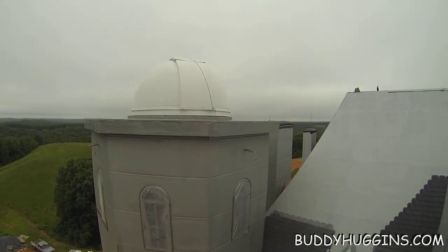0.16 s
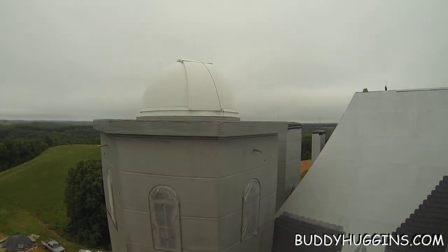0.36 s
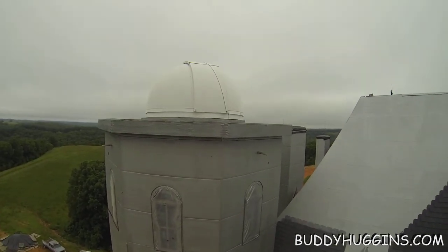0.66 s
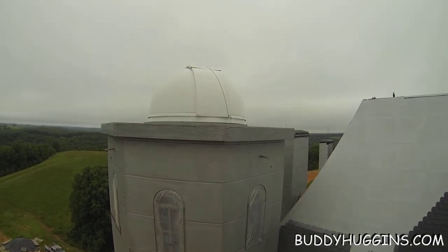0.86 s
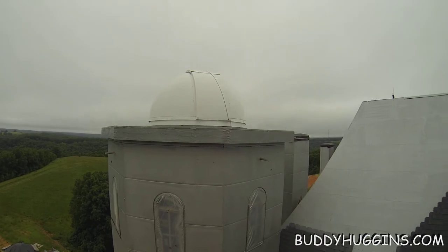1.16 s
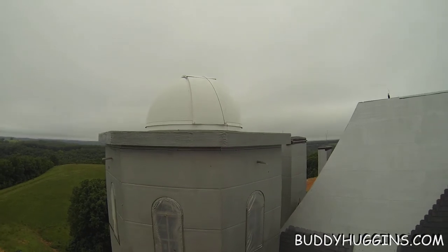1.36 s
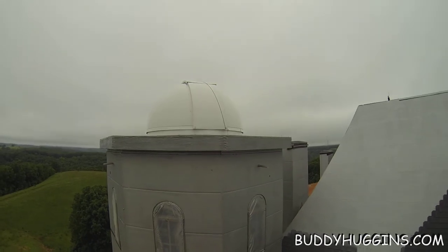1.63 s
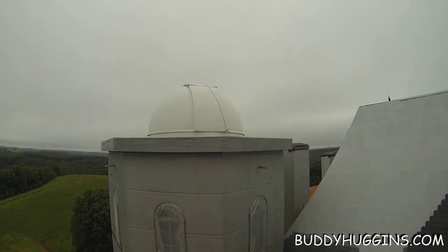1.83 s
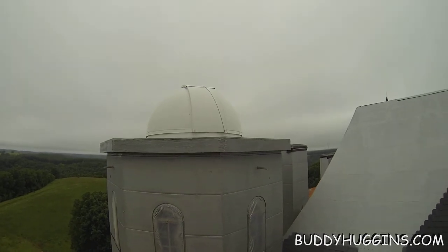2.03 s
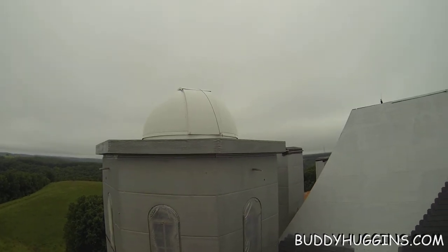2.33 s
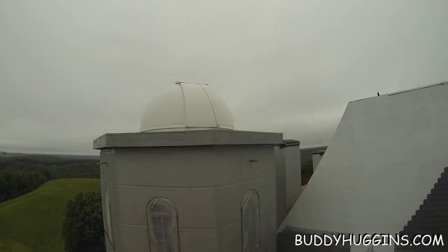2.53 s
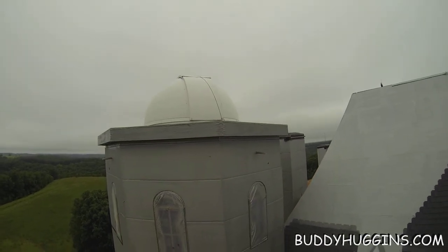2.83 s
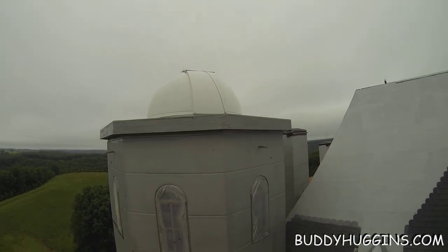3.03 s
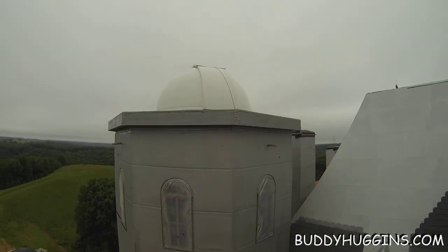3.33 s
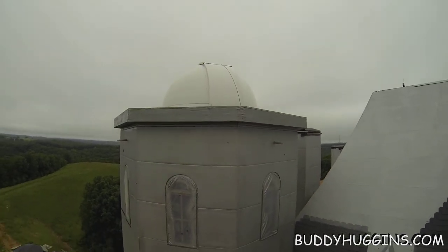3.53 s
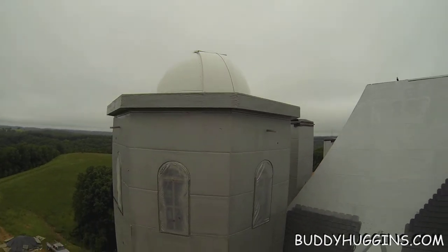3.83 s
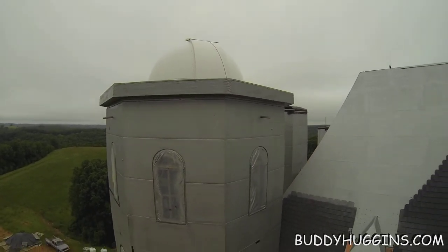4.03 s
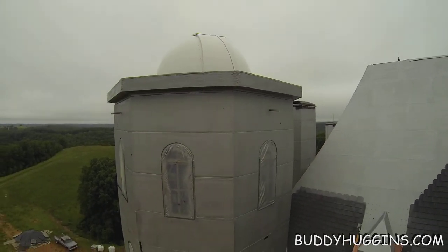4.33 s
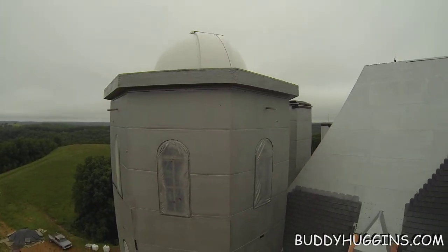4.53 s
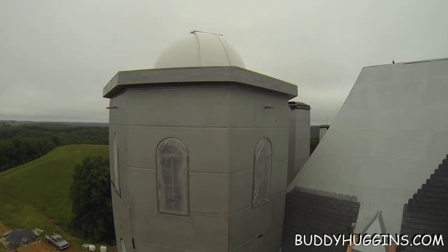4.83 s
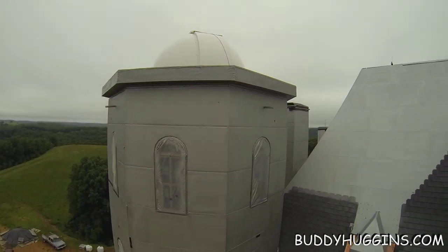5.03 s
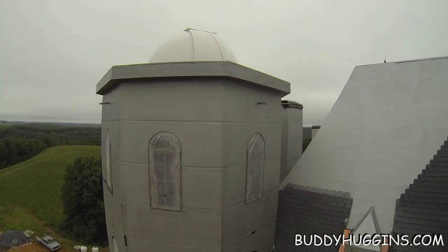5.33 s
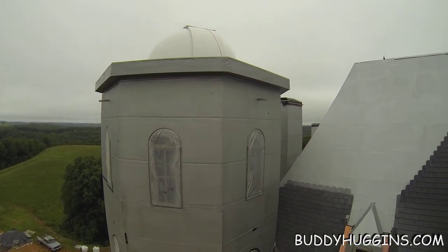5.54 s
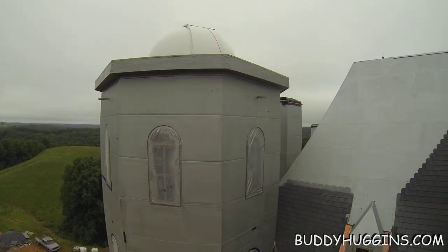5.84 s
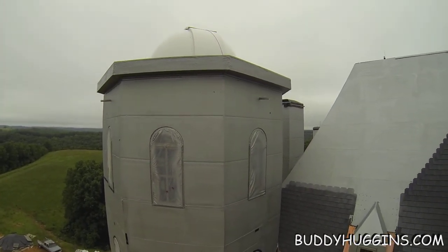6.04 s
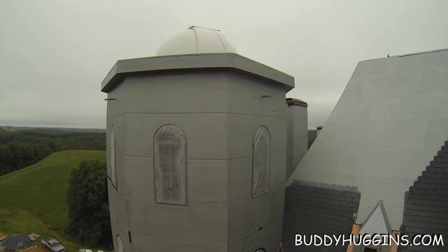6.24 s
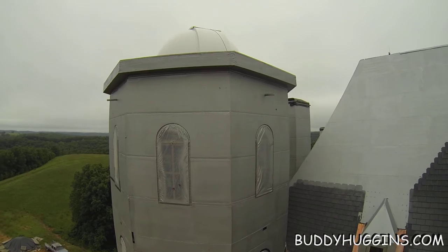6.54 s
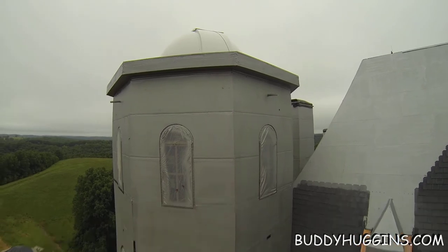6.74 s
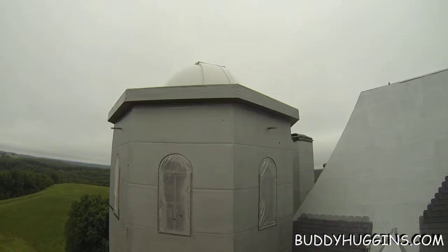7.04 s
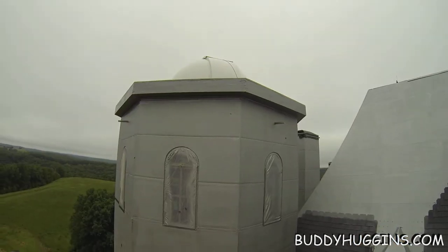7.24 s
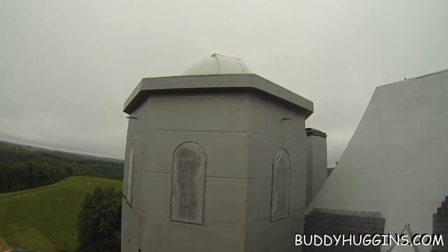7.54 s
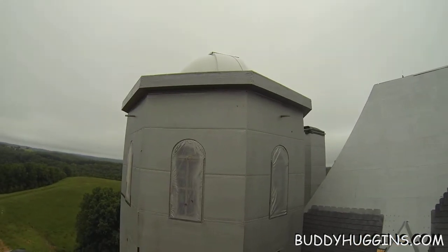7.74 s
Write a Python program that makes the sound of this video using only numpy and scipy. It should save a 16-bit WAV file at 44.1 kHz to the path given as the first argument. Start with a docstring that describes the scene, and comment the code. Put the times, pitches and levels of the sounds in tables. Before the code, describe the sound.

A diesel engine hums low and steadily below a lift basket outdoors; loose metal clatters, then a latch snaps hard nearby and the sound ducks.

```python
"""A diesel hums steadily throughout, far below a small microphone in the basket of a boom lift. The hum is a
stack of sines locked to the four-stroke cycle; roar, rumble and hiss are shaped noise. Loose metal clatters in
the distance in ragged noise bursts, the rail is tapped and a distant bird chirps twice. A latch snaps twice
close to the microphone as decaying sines with a short rattle. A limiter then ducks everything and lets it creep
back."""
import sys
import numpy as np
from scipy import signal
from scipy.io import wavfile
from scipy.ndimage import uniform_filter1d, minimum_filter1d, map_coordinates

SR = 44100
rng = np.random.default_rng(int(sys.argv[2]) if len(sys.argv) > 2 else 0)


def master_out(mix):
    """Clip the mix to full scale and print it as 16-bit PCM to the path in sys.argv[1]."""
    frames = np.transpose(np.atleast_2d(mix))
    ceiling = np.clip(frames, -1, 1)
    pcm = np.round(ceiling * 32767).astype(np.int16)
    wavfile.write(sys.argv[1], SR, pcm)


N = 347949
T = np.arange(N) / SR  # seconds
CONTROL_STEP = 64  # samples between points of the slow engine curves
CONTROL_T = T[::CONTROL_STEP]

# All levels are ahead of the limiter. Noise colours are relative: each noise is evened to rms 1,
# and each clatter knock is scaled by the spread of its own colour.
# Distant bird: start_s, length_s, top_pitch_hz, fundamental_level_db
BIRD_CHIRPS = [(3.255, .052, 2680, -44), (4.578, .04, 2690, -46)]
CHIRP_ARCH, CHIRP_OCTAVE_DB = 0.02, -9  # share by which the pitch arches; level of the octave

# Levels of the wash before its swell at each firing: time_s, hiss_level_db, roar_level_db
WASH_LEVELS = [(0.0, -45, -38.5), (1.2, -45.5, -37), (2.3, -45.5, -35.5), (2.74, -42.5, -33),
               (3.2, -44.5, -33), (3.9, -43.5, -35.5), (6.3, -43.5, -35), (7.3, -41.5, -33.5),
               (7.89, -41, -32)]
# Colour of the roar: frequency_hz, density_db_per_hz
ROAR_COLOUR = [(25, -27), (45, -12.5), (90, -11), (170, -8.5), (280, -0.5), (385, -9), (570, -3),
               (900, -8.5), (1030, -8), (1250, -17), (1600, -47), (2500, -67)]
# Colour of the hiss before its treble tilt: frequency_hz, density_db_per_hz
HISS_COLOUR = [(900, -23.5), (1300, -1.5), (1470, -4.5), (1900, 2.5), (2250, -1), (2800, -4), (3200, -7),
               (3550, -9.5), (4100, -14), (5400, -21), (6100, -26), (7000, -30), (8200, -35.5), (9500, -30),
               (12000, -41.5), (15000, -56), (16000, -85.5)]
HISS_TILT_DB = 2  # per octave above 3 kHz
# Colour of the low rumble: frequency_hz, density_db_per_hz
RUMBLE_COLOUR = [(30, -26.5), (50, -9), (90, -5), (170, 6.5), (230, -8), (400, -32.5), (800, -67.5)]
RUMBLE_DB = -45.5
# Two bands that stand out of the hiss: centre_hz, width_hz
BANDS = [(1900, 190), (3150, 120)]
# Levels of those bands: time_s, lower_band_db, upper_band_db
BAND_LEVELS = [(0, -64.5, -57.5), (2, -52.5, -56), (3.2, -50, -55.5), (5, -57, -61), (6.5, -53.5, -59),
               (7.2, -47, -65), (7.89, -54, -63)]

# Loose metal knocks in the distance: start_s, level_db, brightness_db_per_octave, rise_ms
CLATTER_KNOCKS = [(2.357, -38.5, 0, 1.7), (2.382, -45, -5, 3), (2.421, -56, 0, 2), (2.4455, -40, 1, 0.92),
                  (2.5555, -48, 0, 0.6), (2.644, -37, -1, 3), (2.648, -35, -0.5, 1.2),
                  (2.758, -40.5, -6, 11), (2.764, -44, 6, 5), (2.7905, -33, 2.5, 0.51), (2.799, -39, 2, 3),
                  (2.812, -48, 6, 3), (2.91, -41, -2, 3), (2.9158, -34.5, -0.5, 1.0), (2.928, -44, 4, 3),
                  (3.15, -46, -1, 6), (3.162, -46, 2, 1), (3.2023, -40.5, -2, 1.5), (3.23, -42.5, 3, 3),
                  (3.266, -41, 3, 3.6), (3.4659, -35, -2.5, 1.8), (3.574, -43, 2, 3), (3.586, -40, -3, 4),
                  (3.697, -37.5, 2, 5), (3.703, -36.5, -11, 2.8), (3.72, -50, 0, 3),
                  (3.934, -39, -4.5, 1.7), (3.941, -42, 0, 5), (3.97, -51, 0, 3)]
# Shared colour of the knocks before brightness: frequency_hz, density_db_per_hz
CLATTER_COLOUR = [(700, 2.5), (1500, -3.5), (2200, -2.5), (3500, -1), (5200, -10), (6500, -20), (8200, -27),
                  (9700, -25), (12000, -29), (15700, -36)]
CLATTER_T60_S = 0.24  # at 4 kHz; shorter above, longer below
BODY_SHARE = 3  # brightness also adds this many times its value below 2.5 kHz

# Small taps on the rail: start_s, peak_db, pitch_factor, decay_factor
RAIL_TAPS = [(2.5557, -19, 1.05, 0.34), (2.5755, -18, 1, .3), (2.5785, -12, 1.01, 0.98),
             (2.7905, -20, 1.16, 0.3), (2.835, -25, 1.2, .6), (3.14, -20, 0.98, 0.66),
             (6.2735, -25, 1.1, 0.12), (6.276, -19, 1.49, 0.1), (7.5005, -18, 1.1, 0.14)]
# Rail modes before each tap's factors: frequency_hz, relative_level_db, t60_s
RAIL_MODES = [(695, 0, 0.067), (1010, -9, .015), (1486, -2.5, 0.061), (1810, 0, 0.021), (1950, -3, 0.024),
              (2300, -10, 0.012), (2700, -11.5, 0.023)]

# Contacts of the latch: start_s, ring_peak_db, pitch_factor, decay_factor
LATCH_CONTACTS = [(6.76326, 4.5, 0.902, 1.6), (6.7637, -0.5, 0.86, 0.29), (6.76443, -4, 0.85, 0.54),
                  (6.81541, 24.5, 0.912, 1.3), (6.81625, 28.5, 0.975, 1.16), (6.81714, 20, 0.948, 0.47),
                  (6.8181, 21.5, 1.024, 0.41)]
# Latch housing modes before each contact's factors and dulling: frequency_hz, relative_level_db, t60_s
HOUSING_MODES = [(950, -10.5, 0.0086), (1464, -3, 0.0084), (2227, 11, 0.0037), (2930, -14.5, 0.0104),
                 (3446, -9, 0.0091), (3690, 0.4, 0.0043), (4208, -9, 0.0025), (5880, -23.5, 0.0087),
                 (6670, -10.5, 0.0031), (8300, -19, 0.0053), (9450, -15, 0.0026), (11900, -22.5, 0.0028),
                 (13595, -27.5, 0.0033), (15000, -32.7, 0.0042)]
CONTACT_RISE_S = 0.00088
# Softer contacts lose treble above DULL_HZ: dB per octave for each dB under HARD_DB
DULL_HZ, DULLING, HARD_DB = 5900, 2.2, 18
# Colour of the rattle after each contact: frequency_hz, density_db_per_hz
RATTLE_COLOUR = [(600, -3), (1200, -5), (2500, -4.5), (4500, -16), (7000, -31), (12000, -43)]
# Spring that rings on after the hard snap: frequency_hz, relative_level_db, t60_s
SPRING_MODES = [(3780, -1, .1), (4050, -2, .14), (4420, 1, .18), (4580, -3, 0.22), (4670, -3, .2),
                (5141, -9, .2), (6325, -7, .17)]
SPRING_START_S, SPRING_PEAK_DB = 6.819, -33

# Governed crank speed before quick wavering and sag: time_s, speed_rpm
CRANK_SPEED = [(0, 1805), (.9, 1794), (1.5, 1806), (2.15, 1797), (2.9, 1800), (3.55, 1794), (4.25, 1809),
               (4.9, 1797), (5.5, 1801), (6.5, 1807), (7.4, 1793), (7.89, 1796)]
HUNT_RPM = 1.47  # size of the quick wavering
SAG_AT_S, SAG_RPM, SAG_SPREAD_S = 2.68, 18.11, 0.1186  # a brief load pulls the speed down
# Exhaust note while the basket sinks: time_s, firing_tone_db, octave_db
EXHAUST_LEVELS = [(0.0, -14.5, -32), (2.4, -15, -31.5), (2.7, -16.5, -31.5), (3.2, -15, -32),
                  (4.2, -16, -28), (4.85, -16, -29.5), (5.7, -17, -27), (7.3, -17, -26.5),
                  (7.89, -18.5, -26)]
# Strong block and frame tones: multiple_of_cycle_rate
STRONG_TONES = [5, 7, 9, 12, 16, 17, 18, 19, 20, 23, 29, 31, 33, 37, 40, 41, 45, 51, 54, 67, 72, 68, 69, 74,
                81, 87, 90, 92, 98, 99, 103, 108, 109, 110, 126, 150, 151]
# Their levels with the basket high, before swells and wavering: level_db
BASKET_HIGH_DB = [-48, -56, -49, -50, -49, -53.5, -46.5, -41, -43.5, -45.5, -48.5, -51, -58, -51.5, -49,
                  -53, -53, -50, -48, -47, -51.5, -55, -54, -64.5, -60.5, -60, -63, -59, -66, -65.5, -63,
                  -58.5, -64, -62.5, -60.5, -58, -64]
# Their levels with the basket low, before swells and wavering: level_db
BASKET_LOW_DB = [-47, -49, -49, -47, -57.5, -41.5, -39.5, -59.5, -40.5, -53, -49, -46, -50.5, -42, -50.5,
                 -48.5, -49, -54, -50.5, -54, -53, -50, -58.5, -55, -57.5, -61, -66, -68.5, -61.5, -63, -59,
                 -60, -61.5, -55.5, -63, -62.5, -60]
# Middle of each tone's change from high to low level: time_s
CHANGE_AT_S = [3, 2.3, 3, 5.6, 4.3, 3.7, 1.1, 5.9, 0.96, 3.5, 2.8, 0.69, 3, 3.4, 3.3, 1.7, 0.91, 2.7, 1.3,
               2.6, 2.7, 2.1, 1.8, 3.4, 2.4, 1.2, 3.2, 2.4, 2.2, 3.1, 2.8, 1.2, 3.2, 3.8, 3, 3.6, 2.7]
CHANGE_SPREAD_S = 0.74
# Tones that stand out for a while: multiple_of_cycle_rate
SWELLING_TONES = [20, 20, 31, 54, 72, 18, 18, 67]
# Their swells, row for row: centre_s, spread_s, rise_db
SWELLS = [(3.4, 0.21, 2.5), (5.01, .4, 6), (2.2, .6, 4), (6.5, .5, 5.5), (6.6, .6, 4), (4.5, .6, 1.5),
          (6.5, .4, 2), (1.7, 0.36, 3.5)]
# The other multiples, before wavering: frequency_hz, level_db
FAINT_TONES = [(40, -64.5), (90, -53), (300, -55), (1000, -60.5), (1300, -70.5), (1900, -76), (2400, -70)]

EDGE_HZ = 15350  # upper band limit


def gain_of(db):
    """Amplitude ratio of a level in dB."""
    return 10 ** (np.asarray(db) / 20)


def evened(x):
    """Scale to rms 1."""
    return x / np.sqrt(np.mean(x ** 2) + 1e-20)


def read(points, hz):
    """Read a colour table, straight between points on a log frequency axis."""
    point_hz, value = np.transpose(points)
    return np.interp(np.log(hz + 1), np.log(point_hz + 1), value)


def curves(rows):
    """Draw each column against the time column, at every sample."""
    time_s, *columns = np.transpose(rows)
    return [np.interp(T, time_s, column) for column in columns]


def every_sample(curve):
    """Bring a slow control curve up to the sample rate."""
    return np.interp(T, CONTROL_T, curve)


def bump(t, centre_s, spread_s):
    """A bell curve in time, 1 at its centre."""
    return np.exp(-((t - centre_s) / spread_s) ** 2)


def wander(count, per_s):
    """Slow random curves from normally drawn knots, one a row."""
    knots = rng.standard_normal((count, int(N / SR * per_s) + 3))
    place = np.meshgrid(np.arange(count), CONTROL_T * per_s, indexing="ij")
    return map_coordinates(knots, place, order=3)


def add(mix, start_s, sound):
    """Lay a sound into the mix, cut off at the end."""
    part = mix[round(start_s * SR):][:len(sound)]
    part += sound[:len(part)]


def noise(colour, patchy_db, tilt_db=0):
    """Random short-time spectra with drifting patches; tilt in dB per octave above 3 kHz."""
    frames, hz = N // 256 + 5, np.fft.rfftfreq(1024, 1 / SR)
    real, imaginary, patches = rng.standard_normal((frames, 513, 3)).T
    patches = uniform_filter1d(patches, size=8, axis=0)  # across frequency
    patches = evened(uniform_filter1d(patches, size=16, axis=1))  # across time
    octaves = np.log2(np.maximum(hz, 3000) / 3000)
    colour_db = read(colour, hz) + tilt_db * octaves
    spectra = (real + 1j * imaginary) * gain_of(colour_db[:, None] + patchy_db * patches)
    return evened(signal.istft(spectra, nperseg=1024, noverlap=768)[1][:N])


def ring(modes, rise_s, pitch=1, decay=1):
    """A struck object: decaying sines after a soft contact, peak 1."""
    t = T[:SR // 4]
    x = np.zeros(len(t))
    for hz, level_db, t60_s in modes:
        envelope = gain_of(level_db - 60 * t / (t60_s * decay))
        x += envelope * np.sin(2 * np.pi * hz * pitch * t)
    x *= np.sin(np.pi / 2 * np.minimum(t / rise_s, 1)) ** 2
    return x / abs(x).max()


def chirp(length_s, top_hz):
    """A short whistle with its octave, rising and falling a little."""
    arch = np.sin(np.pi * T[:int(length_s * SR)] / length_s)
    pitch_hz = top_hz * (1 - CHIRP_ARCH + CHIRP_ARCH * arch)
    phase = 2 * np.pi * np.cumsum(pitch_hz) / SR
    return arch ** 0.6 * (np.sin(phase) + gain_of(CHIRP_OCTAVE_DB) * np.sin(2 * phase))


def distant_bird():
    """Two faint whistles, each a gliding sine and its octave."""
    out = np.zeros(N)
    for start_s, length_s, top_hz, level_db in BIRD_CHIRPS:
        add(out, start_s, gain_of(level_db) * chirp(length_s, top_hz))
    return out


def wash(cycle):
    """Rumble, roar and hiss of casing, fan and pump; roar and hiss swell a little at each firing."""
    hiss_db, roar_db = curves(WASH_LEVELS)
    firing = np.cos(4 * cycle)
    out = gain_of(roar_db + 0.5 * firing) * noise(ROAR_COLOUR, patchy_db=0.5)
    for (hz, width), level_db in zip(BANDS, curves(BAND_LEVELS)):
        colour = [(hz - 3 * width, -60), (hz - width, -6), (hz, 0), (hz + width, -6), (hz + 3 * width, -60)]
        out += gain_of(level_db) * noise(colour, patchy_db=0.5)
    out += gain_of(RUMBLE_DB) * noise(RUMBLE_COLOUR, patchy_db=-4.0)
    hiss = noise(HISS_COLOUR, patchy_db=0.34, tilt_db=HISS_TILT_DB)
    return out + gain_of(hiss_db + 0.35 * firing) * hiss


def clatter():
    """Each knock is a burst of noise, ragged with small contacts, whose treble dies first."""
    out, hz = np.zeros(N), np.fft.rfftfreq(128, 1 / SR)
    length = 12800  # samples
    t_burst = T[:length]
    octaves = np.log2(np.maximum(hz, 500) / 4000)[:, None]
    body = (hz < 2500)[:, None]
    t60_s = CLATTER_T60_S * 2 ** (-0.55 * octaves)
    bursts = rng.standard_normal((len(CLATTER_KNOCKS), length))
    for (start_s, level_db, bright_db, rise_ms), burst in zip(CLATTER_KNOCKS, bursts):
        _, t, spectra = signal.stft(burst, SR, nperseg=128)
        fall_db = -60 * np.maximum(t - 0.006, 0) / t60_s
        # raggedness: one curve for all frequencies, and one for each group of nine bins
        together = evened(uniform_filter1d(burst[:len(t)], size=3))
        patches = evened(uniform_filter1d(burst[:8 * len(t)].reshape(8, -1), size=4))
        patches = patches.repeat(9, axis=0)[:len(hz)]
        ragged_db = 0.97 * together + 2.33 * patches
        # brighter knocks gain treble and body, duller ones lose both
        colour_db = read(CLATTER_COLOUR, hz)[:, None] + bright_db * (octaves + BODY_SHARE * body)
        x = signal.istft(spectra * gain_of(colour_db + fall_db + ragged_db), SR, nperseg=128)[1]
        x = x / gain_of(colour_db).std()
        x = x * (1 + 1.4 * np.exp(-t_burst / 0.0013))  # sharper start
        add(out, start_s, gain_of(level_db) * x * np.minimum(t_burst * 1000 / rise_ms, 1))
    return out


def rail_taps():
    """Small taps set the modes of the rail ringing."""
    out = np.zeros(N)
    for start_s, peak_db, pitch, decay in RAIL_TAPS:
        add(out, start_s, gain_of(peak_db) * ring(RAIL_MODES, 0.0017, pitch, decay))
    return out


def latch():
    """Each contact rings the housing, which rattles briefly; a spring rings on after the hard snap."""
    out, rattle = np.zeros(N), noise(RATTLE_COLOUR, patchy_db=1.5)
    t = T[:SR // 8]
    for start_s, peak_db, pitch, decay in LATCH_CONTACTS:
        dulling = DULLING * min(peak_db - HARD_DB, 0)  # dB per octave
        modes = [(hz, level_db + dulling * np.log2(max(hz / DULL_HZ, 1)), t60_s)
                 for hz, level_db, t60_s in HOUSING_MODES]
        body = ring(modes, CONTACT_RISE_S, pitch, decay)[:len(t)]
        # relative to the ring, the rattle is weaker after harder contacts
        tail_db = -30.5 - 0.33 * peak_db - 60 * t / 0.054
        tail = rattle[round(start_s * SR):][:len(t)] * gain_of(tail_db) * np.minimum(t / 0.0015, 1)
        add(out, start_s, gain_of(peak_db) * (body + tail))
    add(out, SPRING_START_S, gain_of(SPRING_PEAK_DB) * ring(SPRING_MODES, rise_s=0.004))
    return out


def engine_cycle():
    """Phase of the four-stroke cycle, two crank turns each, as the governor hunts and a load tugs."""
    hunt = every_sample(wander(count=1, per_s=3.0)[0])
    rpm = curves(CRANK_SPEED)[0] + HUNT_RPM * hunt - SAG_RPM * bump(T, SAG_AT_S, SAG_SPREAD_S)
    return 2 * np.pi * np.cumsum(rpm / 120) / SR


def strong_tone_levels():
    """Block and frame tones change over as the basket sinks, and some swell for a while."""
    levels = {}
    for k, high_db, low_db, at_s in zip(STRONG_TONES, BASKET_HIGH_DB, BASKET_LOW_DB, CHANGE_AT_S):
        lowered = (1 + np.tanh((CONTROL_T - at_s) / CHANGE_SPREAD_S)) / 2
        levels[k] = high_db + (low_db - high_db) * lowered
    for k, (centre_s, spread_s, rise_db) in zip(SWELLING_TONES, SWELLS):
        levels[k] = levels[k] + rise_db * bump(CONTROL_T, centre_s, spread_s)
    return levels


def engine(cycle):
    """Four firings per cycle give the hum; unequal cylinders fill in the multiples of the cycle rate."""
    firing_db, octave_db = curves(EXHAUST_LEVELS)
    out = gain_of(firing_db) * np.sin(4 * cycle) + gain_of(octave_db) * np.sin(8 * cycle)
    start_phase = rng.random(160) * 2 * np.pi
    slow = wander(count=160, per_s=0.88)
    quick = wander(count=160, per_s=5.0)
    late = wander(count=160, per_s=3.0)
    strong = strong_tone_levels()
    for k in set(range(3, 160)) - {4, 8}:
        # faint multiples come and go; the cycle rate is about 15 Hz
        faint_db = read(FAINT_TONES, 15 * k) + 4.5 * slow[k]
        level_db = strong.get(k, faint_db) + 0.32 * slow[k] + 1.5 * quick[k]  # uneven combustion
        phase = start_phase[k] + 0.2 * late[k]
        out += every_sample(gain_of(level_db)) * np.sin(k * cycle + every_sample(phase))
    return np.sqrt(2) * out  # tone levels are rms


def scene():
    """The sounds at the basket, from the background to the engine."""
    cycle = engine_cycle()
    background = distant_bird() + wash(cycle)
    hits = clatter() + rail_taps() + latch()
    return (background + hits + engine(cycle))[None]


def record(dry):
    """A look-ahead limiter: a quick stage holds down the peak, a slow stage creeps back; then clip and band limit."""
    over_db = np.maximum(20 * np.log10(abs(dry[0]) + 1e-9) + 1.3, 0)  # above -1.3 dB of full scale
    ahead = int(0.005 * SR)
    over_db = -minimum_filter1d(-over_db, size=ahead, origin=-(ahead // 2))  # highest peak just ahead
    quick, slow = T * 220.0, T * 15.7  # recovery in dB per second
    quick_db = np.maximum.accumulate(0.86 * over_db + quick) - quick
    slow_db = np.maximum.accumulate(0.61 * over_db + slow) - slow
    duck_db = uniform_filter1d(np.maximum(quick_db, slow_db), size=130)
    clipped = np.clip(dry / gain_of(duck_db), -1, 1)
    padded = np.pad(clipped, ((0, 0), (127, 127)), "reflect", reflect_type="odd")
    lowpass = signal.firwin(255, EDGE_HZ, window=("kaiser", 8), fs=SR)
    return signal.oaconvolve(padded, lowpass[None], "valid", axes=1)


dry = scene()
out = record(dry)
master_out(out)
```